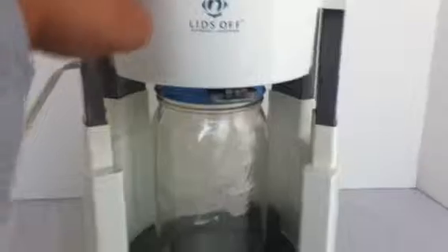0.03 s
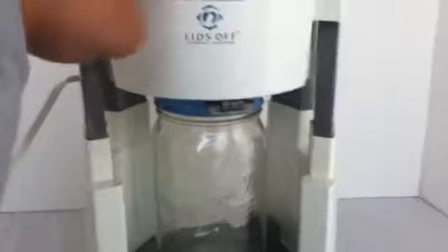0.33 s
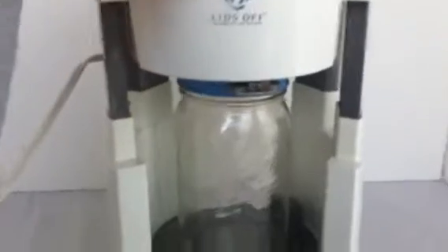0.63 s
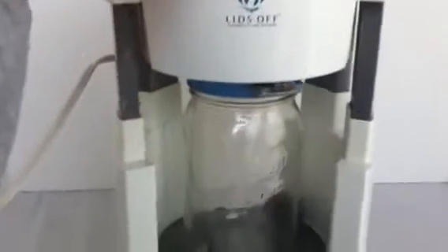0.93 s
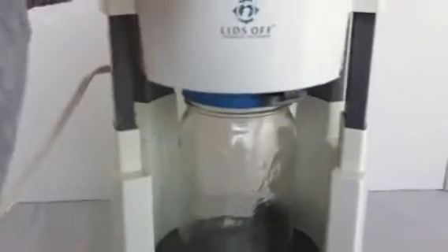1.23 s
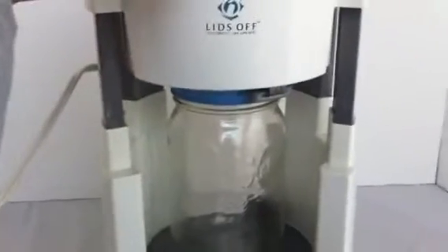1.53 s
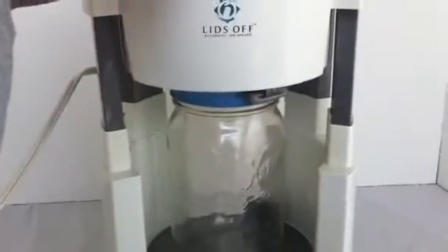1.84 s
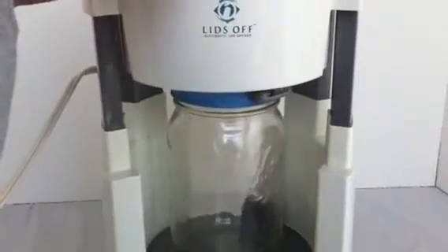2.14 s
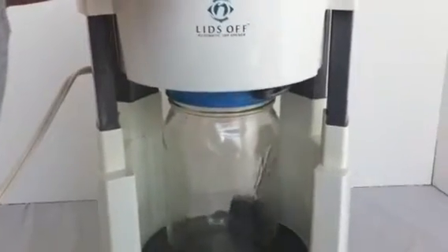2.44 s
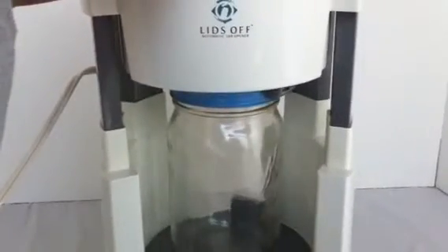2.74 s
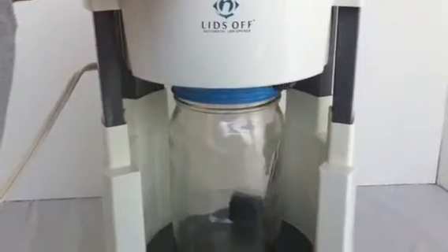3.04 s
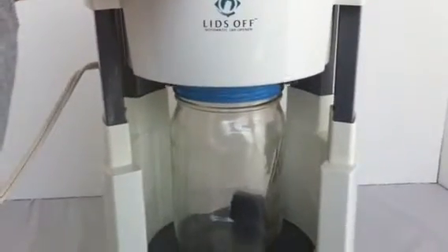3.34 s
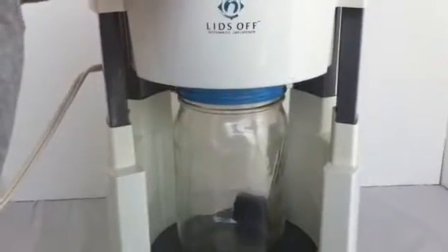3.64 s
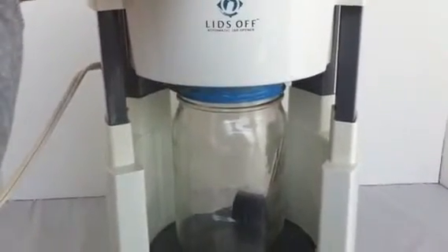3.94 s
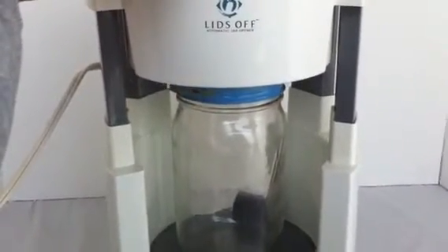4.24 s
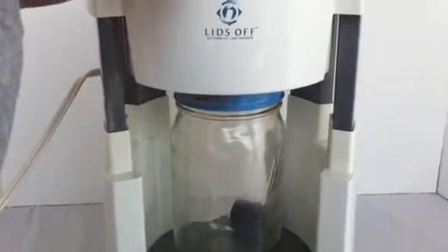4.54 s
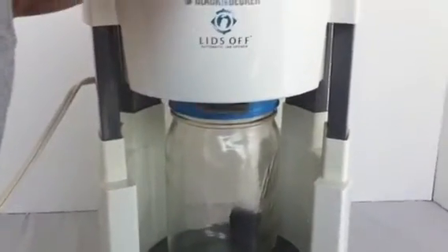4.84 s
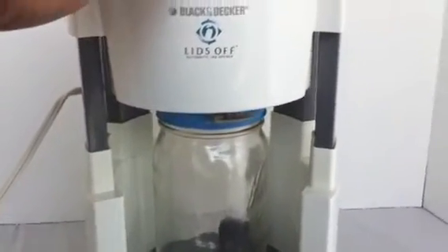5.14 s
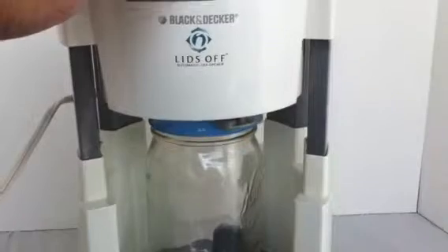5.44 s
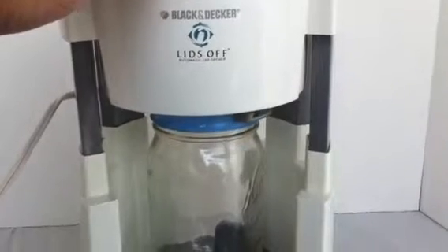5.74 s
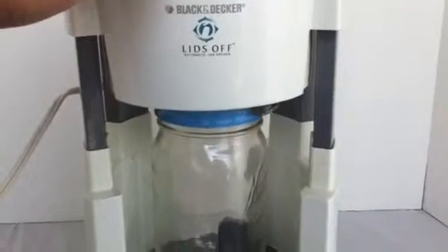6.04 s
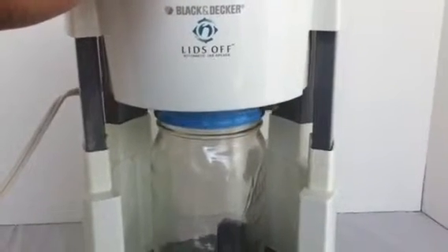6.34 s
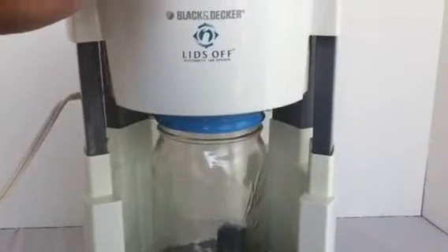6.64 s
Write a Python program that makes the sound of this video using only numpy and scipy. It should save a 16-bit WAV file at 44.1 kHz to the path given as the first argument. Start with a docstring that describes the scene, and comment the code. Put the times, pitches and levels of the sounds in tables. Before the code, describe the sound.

In a small, quiet room, light plastic knocks lead to a hard click as an electric jar opener on a table switches on. Its motor hums and whines over rattling, ticking gears. The pitch sags while the jaws grip the lid, bringing a cluster of cracks and some short squeals. Then the motor picks up again, two more knocks sound, and it whirs on freely to the end.

```python
"""The small mains motor of an electric jar opener spins up, hums and whines on a table.
It hums once per turn of its shaft and whines at multiples of its eight commutator bars (the
turning contacts). First a hand knocks the plastic housing and presses the start bar. Then the
gears rattle, tick and squeal; the motor slows while the jaws strain at the lid, then runs freely."""
import sys
import numpy as np
from scipy import signal
from scipy.fft import rfft, irfft
from scipy.io import wavfile
from scipy.ndimage import uniform_filter1d

SR = 44100
rng = np.random.default_rng(int(sys.argv[2]) if len(sys.argv) > 2 else 0)


def persist_wave(psi):
    """Save psi, clipped to +-1, as 16-bit WAV."""
    counts = np.round(np.clip(psi, -1, 1) * 32767).astype(np.int16)
    wavfile.write(sys.argv[1], SR, np.atleast_2d(counts).T)


N = 295470
T = np.arange(N) / SR

# motor speed once it is up, sagging while the jaws strain: (time [s], shaft rate [Hz])
SHAFT_SPEED = [(1.2, 259.9), (1.26, 260.8), (2.14, 262.2), (2.37, 260.6), (2.92, 249.2), (2.97, 247.0),
               (3.08, 245.4), (3.2, 245.6), (3.44, 250.0), (3.7, 251.8), (3.9, 256.0), (4.37, 257.2),
               (4.79, 256.9), (5.2, 261.4), (5.52, 261.7), (5.83, 260.6), (6.5, 260.1), (6.68, 260.9)]
# hum of the unbalanced rotor: (time [s], level [dB])
ROTOR_HUM = [(1.06, -29.5), (1.91, -28), (2.45, -34), (2.5, -31), (2.77, -29), (3.11, -31), (3.18, -29),
             (4.73, -27), (4.99, -30.5), (5.17, -27.5), (5.65, -29.5), (5.69, -31), (6.39, -29.5),
             (6.69, -35.5)]
# tone at three times the shaft rate: (time [s], level [dB])
THIRD_TONE = [(1.06, -42), (1.61, -40), (1.83, -44.5), (2.03, -36.5), (2.71, -53), (3.05, -43.5),
              (3.3, -60), (3.93, -41), (4.62, -51.5), (5.34, -38), (6.28, -55), (6.69, -45.5)]
# main tones of the whine: (multiple [x shaft rate, rounded], lid tight [dB], lid loose [dB],
# added at full load [dB], added at switch-on [dB], throb [dB])
WHINE_TONES = [(8, -47.5, -51, 3.5, 0, 1.5), (16, -53.5, -46, 3.5, 8.5, -0.5), (24, -58, -49, 4.5, -8, 3),
               (32, -57, -56, 9.5, 4, 1.5), (38, -59.5, -43.5, -3, 6, 3), (48, -51, -53.5, -1.5, 14, 1),
               (63.6, -67, -72, 9, 35, 5)]
# frame resonances that lift a tone gliding through them: (pitch [Hz], width [Hz], lift [dB])
FRAME_RINGS = [(2009, 5.4, -2), (3878, 207, 16), (4085, 33, 4), (7973, 55, 7.5), (8140, 144, 12.5),
               (9620, 300, 8.5), (11980, 230, 9)]
# low overtones of the shaft: (multiple [x shaft rate], jaws open [dB], jaws gripping [dB])
LOW_TONES = [(2, -61.5, -61.5), (4, -52, -48.5), (5, -54, -54), (6, -59.5, -51), (7, -53.5, -54.5),
             (9, -52, -55.5), (10, -60, -53)]
# groups of tones from uneven commutator bars:
# (middle [x shaft rate], jaws open [dB], jaws gripping [dB], added at full load [dB])
TONE_GROUPS = [(15, -55, -54, -2.5), (23.3, -60.5, -53.5, 1), (31.3, -51.5, -58, 9.5),
               (40.6, -52, -51, -2.5), (47.7, -50, -64, 19), (55.4, -52.5, -56, 1)]
# one tone sings out briefly: (peak time [s], length [s], multiple [x shaft rate], level [dB])
SQUEAL_TONES = [(1.076, 0.13, 15, -44.5), (1.1, .2, 21, -51), (2.517, .1, 4, -43), (2.59, .32, 23, -47.5),
                (2.593, 0.14, 5, -47.5), (3.06, 0.081, 8, -41), (3.063, 0.093, 18, -47),
                (3.107, 0.11, 7, -38.5), (3.277, 0.16, 10, -38), (3.372, 0.12, 12, -49),
                (3.51, 0.23, 9, -41), (3.524, 0.12, 16, -40), (3.597, 0.49, 11, -46), (3.45, .3, 14, -50.5),
                (3.786, 0.085, 14, -49), (3.847, 0.12, 10, -41), (3.963, 0.87, 23, -48.5),
                (4.197, 0.79, 10, -46.5), (4.204, 0.37, 6, -44.5), (4.29, 0.79, 5, -48),
                (4.44, 0.55, 4, -44.5)]
# tone colour of the sliding gear teeth: (frequency [Hz], relative level [dB])
RUSTLE_COLOUR = [(60, -63), (110, -29.5), (200, -5.5), (300, 8.5), (420, -7.5), (600, -12.5), (800, 1.5),
                 (1200, -15), (2300, -2), (3200, -15.5), (4000, -9), (7000, -12), (12000, 4), (15000, -43)]
# rasp of the loaded gear teeth: (time [s], level [dB])
TOOTH_RASP = [(2.2, -57), (2.8, -52.5), (3.8, -44), (4.15, -52.5), (5.05, -54)]
# blows on the housing and cracks of the jaws:
# (time [s], strength [dB], relative thud [dB], relative snap [dB], time to fade by 60 dB [s])
BLOWS = [(0.1196, -33, -13, -18, 0.04), (.143, -33, -18, -14, 0.083), (.156, -24, -23, -2, .028),
         (.224, -42, -1.5, -8, 0.054), (0.288, -51, 10, -8, 0.065), (0.331, -31.5, -8.5, -25, .047),
         (.347, -41, -3, -10, 0.061), (0.533, -40.5, -14, -5, 0.037), (.566, -38, -2.5, 15.5, 0.059),
         (0.633, -36, -9, -21, 0.035), (.679, -38, -12, -40, 0.036), (.708, -37, -14, -26, .03),
         (.723, -35, -5, -35, 0.025), (0.853, -26, 1, -22, 0.066), (.862, -20.5, -31, 6, 0.054),
         (2.271, -24, -26, 1, 0.065), (2.477, -27.5, -11, 2, 0.042), (2.508, -27, -13, -4, 0.033),
         (2.641, -24, -11, -6, .024), (2.753, -22, -13, 4, 0.04), (2.808, -22.5, -12, -8, 0.025),
         (2.887, -21.5, -12, -5, 0.054), (2.903, -26, -30, 2, 0.041), (2.931, -28, -15, 12, 0.041),
         (4.928, -24.5, -17, 6, .017), (5.086, -21, -11, -30, 0.034)]
# ringing of the plastic housing: (pitch [Hz], width [Hz], gain [dB])
HOUSING_RINGS = [(270, 127, 6), (359.3, 70, 9.5), (740, 123, 11), (1131, 236, 9), (1312, 87, 11),
                 (1690, 217, 3.5), (2230, 274, 3.5), (2720, 750, -2), (3800, 980, -5), (6160, 1000, -21.5),
                 (7500, 230, -9), (10700, 11300, -13.5)]
# magnetic hum of the windings: (pitch [Hz], relative level [dB])
MAINS_TONES = [(120, 2), (240, 8), (360, 7), (480, 2.5)]
# steady background of the room: (frequency [Hz], relative level [dB])
ROOM_COLOUR = [(18, -26), (30, -16), (62, -11.5), (312, 2), (928, -11), (2430, -17.5), (2990, -24.5),
               (7060, -27.5), (8250, -27.5), (15000, -25.5)]

SWITCH_S = .862  # the motor is switched on
FREE_HZ, STRAINED_HZ = 262.5, 245.5  # shaft rate with no load and with full load
PULSE_HZ = 120  # the current swells twice in each mains cycle
GEAR_RATIO = 27  # shaft turns per turn of the first gear wheel


def motor(rate, spun, load, angle):
    """The unbalanced rotor hums; whine, weaker tones and squeals sit at multiples of its rate."""
    rise = spun ** 6.2
    gains = {k: gain * rise for k, gain in weak_tones(load).items()} | whine(rate, load, angle)
    gains[3] = undb(curves(THIRD_TONE)[0] - 1 + 1.24 * wander(20)) * rise
    for peak_s, length, k, db in SQUEAL_TONES:
        swell = 0.5 ** (np.abs(2 * (T - peak_s) / length) ** 2.6 / 2)
        squeal = undb(db) * swell * (1 + .23 * wander(120))
        gains[k] = np.hypot(gains.get(k, 0), squeal)
    tones = sum(gain * sine(k * angle) for k, gain in gains.items())
    current = 1 + .07 * np.sin(2 * np.pi * PULSE_HZ * T)
    hum = undb(curves(ROTOR_HUM)[0] + .48 * wander(30)) * rise * np.sin(angle)
    fade_in = np.interp(T, [.885, .94], [0, 1])
    return np.sqrt(2) * (hum + tones * current) * fade_in


def drive(from_s=.8405, spin_up_s=.0605):
    """The motor gathers speed: gives shaft rate [Hz], share of speed reached (0-1) and load (0-1)."""
    speed, = curves(SHAFT_SPEED)
    spun = 1 - die_away(from_s, spin_up_s)
    load = np.clip((FREE_HZ - speed) / (FREE_HZ - STRAINED_HZ), 0, 1)
    return speed * spun, spun, load


def shaft_angle(rate, load):
    """How far the rotor has turned; the pulsing mains and the first gear wheel rock its speed."""
    chatter = .0005 + .04 * die_away(SWITCH_S, .08)  # the starting current makes the brushes chatter
    wheel = np.sin(2 * np.pi * np.cumsum(rate) / SR / GEAR_RATIO)
    ripple = (.0015 + .0042 * np.sqrt(load)) * np.sin(2 * np.pi * PULSE_HZ * T)
    shake = .0004 * wheel + ripple + .0004 * wander(40) + chatter * wander(500)
    return 2 * np.pi * np.cumsum(rate * (1 + shake)) / SR


def whine(rate, load, angle, loosening_s=(3.87, 6)):
    """Gain of each main tone: it shifts with the current, throbs with the gear and rings the frame."""
    loose = np.interp(T, loosening_s, [0, 1])
    surge = die_away(SWITCH_S, .19)
    gains = {}
    for multiple, tight_db, loose_db, load_db, surge_db, throb_db in WHINE_TONES:
        k = round(multiple)
        lift = sum(db / (1 + (2 * (k * rate - hz) / width) ** 2) for hz, width, db in FRAME_RINGS)
        throb = throb_db * sine(angle / GEAR_RATIO)
        db = tight_db + loose * (loose_db - tight_db) + load * load_db + surge * surge_db + lift + throb
        gains[k] = undb(db + 2.07 * wander(5)) * (1 + .13 * wander(90))
    return gains


def weak_tones(load, gripping_s=(1.8, 2.75), fall_db=6.5):
    """Gain of each weak tone: it shifts as the jaws grip and flickers with the play in the bearings."""
    grip = np.interp(T, gripping_s, [0, 1])
    levels = {round(k): free + grip * (held - free) for k, free, held in LOW_TONES}
    for k in range(max(levels) + 1, 61):
        middle, free, held, load_db = min(TONE_GROUPS, key=lambda row: abs(row[0] - k))
        group_db = free + grip * (held - free) + load * load_db - fall_db * abs(k - middle)
        floor_db = -72 + 6.5 * load
        dip_db = -38 * np.exp(-((k * FREE_HZ - 7160) / 565) ** 2)  # the housing hardly lets this band out
        levels[k] = np.maximum(group_db, floor_db) + dip_db
    return {k: undb(db + 2 * wander(4.09)) * (1 + .38 * wander(90)) for k, db in levels.items()}


def gears(angle, clack_db=-46.5, rustle_db=-42.5):
    """Loose teeth clack on the housing about once a turn; sliding teeth rustle and loaded ones rasp."""
    turns = np.diff(np.floor(angle / (2 * np.pi) + .2 * wander(500)), prepend=0) > 0
    hits = turns * undb(4 * noise()) * rng.choice([-1, 1], N)
    clacks = unit(band(housing(hits), 3340, "low"))
    rustle = unit(colour(noise(), RUSTLE_COLOUR)) * undb(2.8 * wander(30)) * (1 + .14 * np.sin(angle))
    hiss = band(noise(), 1300, "high")
    rasp = unit(band(band(hiss, 5500, "low"), 5500, "low")) * (1 + .34 * np.sin(angle))
    rattle = undb(clack_db) * clacks + undb(rustle_db) * rustle + undb(curves(TOOTH_RASP)[0]) * rasp
    return band(rattle, 6500, "low")  # the closed gearbox holds back the treble


def knocks(thud_hz=450, snap_hz=4500, thud_boost_db=17):
    """Each blow is a short chatter of plastic parts; soft ones thud, hard ones snap."""
    body, thud, snap = np.zeros((3, N))
    age = T[:SR // 4]
    for start_s, db, thud_db, snap_db, fade_s in BLOWS:
        burst = undb(db - 60 * age / fade_s) * noise(len(age))
        at = slice(int(start_s * SR), int(start_s * SR) + len(age))
        body[at] += burst
        thud[at] += burst * undb(thud_db + thud_boost_db)
        snap[at] += burst * undb(snap_db)
    middle = band(band(body, thud_hz, "high"), snap_hz, "low")
    bass = band(band(thud, thud_hz, "low"), thud_hz, "low")
    return housing(middle - bass - band(snap, snap_hz, "high"))


def ticks(load, level_db=-55, fade_s=.012):
    """Gear teeth catch and slip at random, more often under load."""
    per_second = (8.5 + 25 * load) * (T > SWITCH_S)
    slips = (rng.random(N) < per_second / SR) * undb(3 * noise())
    fade = undb(-60 * T[:SR // 20] / fade_s)
    chatter = housing(signal.fftconvolve(slips, fade)[:N] * noise())
    return undb(level_db) * unit(band(band(chatter, 800, "high"), 4000, "low"))


def housing(x):
    """The plastic shell rings at its own pitches when it is struck."""
    return sum((-1) ** k * undb(db) * signal.lfilter(*signal.iirpeak(hz, hz / width, fs=SR), x)
               for k, (hz, width, db) in enumerate(HOUSING_RINGS))


def sparks(angle, above_hz=9000, start_db=-43, steady_db=-60):
    """The brushes spit fizz on each turn: louder while the starting current flows, then faint."""
    fizz = unit(band(band(noise(), above_hz, "high"), above_hz, "high")) * (1 + .55 * np.sin(angle))
    return fizz * (undb(steady_db) + undb(start_db) * die_away(SWITCH_S, .15))


def windings(load):
    """The iron in the coils buzzes with the mains; its lowest tone grows at switch-on and under load."""
    current = undb(-71 + 11.5 * np.sqrt(load)) + undb(-52.5) * die_away(SWITCH_S, .045)
    (low_hz, low_db), *upper = MAINS_TONES
    hum = current * undb(low_db) * np.sin(2 * np.pi * low_hz * T)
    buzz = sum(undb(db + 3.9 * wander(5.3)) * sine(2 * np.pi * hz * T) for hz, db in upper)
    return np.sqrt(2) * (hum + undb(-62) * buzz)


def room_echo(x, fade_s=.21, echo_db=-9):
    """A small room adds a short, duller tail."""
    age = T[:SR // 2]
    tail = band(noise(len(age)), 5000, "low") * undb(-60 * age / fade_s) * (age > .006)
    return x + undb(echo_db) * signal.fftconvolve(x, tail / np.linalg.norm(tail))[:N]


def room_tone(level_db=-57.5):
    """A faint, steady rush fills the room."""
    return undb(level_db) * unit(colour(noise(), ROOM_COLOUR))


def undb(db):
    """Turn decibels into a gain."""
    return 10 ** (np.asarray(db) / 20)


def unit(x):
    """Scale to an average power of 1."""
    return x / np.sqrt(np.mean(x ** 2))


def noise(count=N):
    """Plain white noise."""
    return rng.standard_normal(count)


def sine(angle):
    """A sine wave that starts at a random point in its cycle."""
    return np.sin(angle + rng.uniform(0, 2 * np.pi))


def die_away(start_s, decay_s):
    """Stay at 1 until start_s, then sink towards 0."""
    return np.exp(-np.maximum(T - start_s, 0) / decay_s)


def curves(table):
    """Join the points of a time table with straight lines."""
    times, *columns = np.transpose(table)
    return [np.interp(T, times, column) for column in columns]


def wander(rate):
    """A smooth random wobble of size about 1 that changes rate times a second."""
    hold = max(int(SR / rate), 2)
    steps = np.repeat(noise(N // hold + 2), hold)[rng.integers(hold):][:N]
    return unit(uniform_filter1d(steps, hold))


def colour(x, points):
    """Shape the tone colour with (frequency [Hz], level [dB]) points."""
    hz, db = np.transpose(points)
    freqs = np.maximum(np.fft.rfftfreq(N, 1 / SR), 1)
    return irfft(rfft(x) * undb(np.interp(np.log(freqs), np.log(hz), db)), N)


def band(x, hz, kind):
    """Keep the "low" or the "high" side of hz, with a gentle slope."""
    return signal.sosfilt(signal.butter(2, hz, kind, fs=SR, output="sos"), x)


def scene():
    """Knocks, then the running machine, over the quiet room."""
    rate, spun, load = drive()
    angle = shaft_angle(rate, load)
    running = np.clip((T - SWITCH_S) / .017, 0, 1)
    rattle = spun ** 4.9 * gears(angle)
    clatter = room_echo(knocks() + running * (rattle + ticks(load) + sparks(angle)))
    air = room_tone()
    return (motor(rate, spun, load, angle) + running * windings(load) + clatter + air)[None]


def record(dry, start_s=.119, bass_hz=95, top_hz=15750):
    """Silence until the first knock; the deep bass and the highest treble are cut."""
    thin = band(dry * (T > start_s), bass_hz, "high")
    return signal.sosfilt(signal.ellip(10, .2, 80, top_hz, fs=SR, output="sos"), thin)


dry = scene()
out = record(dry)
persist_wave(out)
```